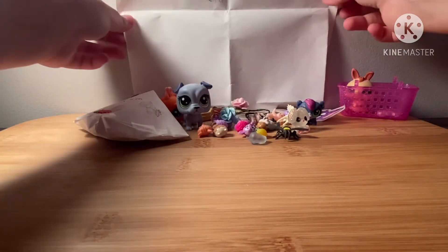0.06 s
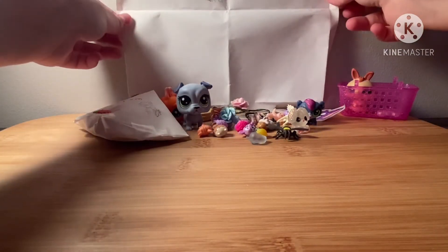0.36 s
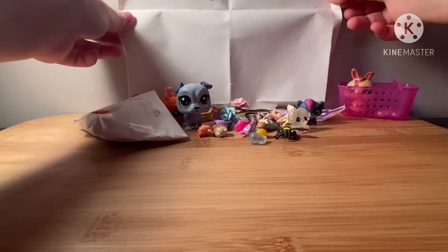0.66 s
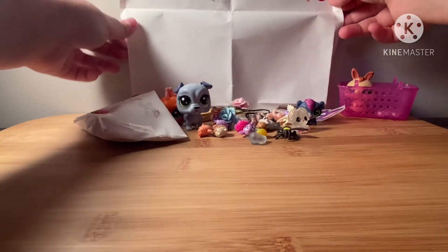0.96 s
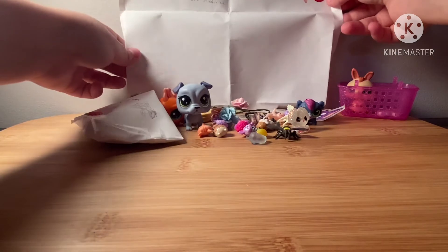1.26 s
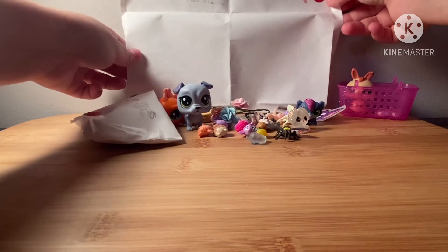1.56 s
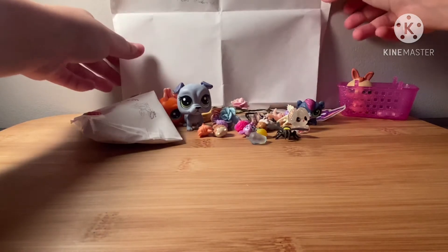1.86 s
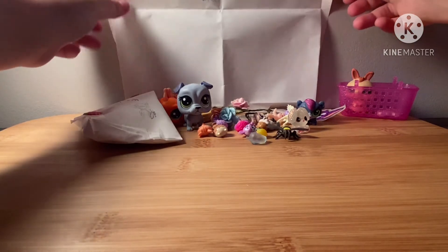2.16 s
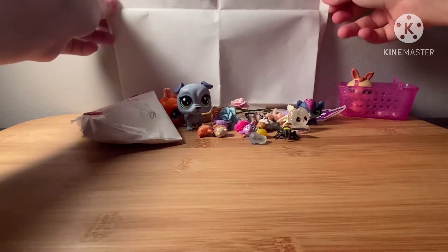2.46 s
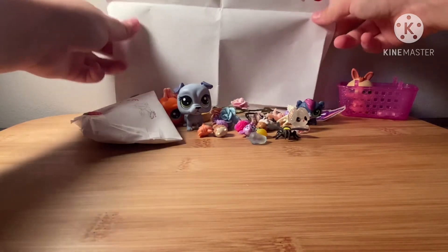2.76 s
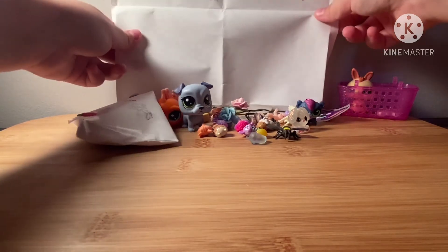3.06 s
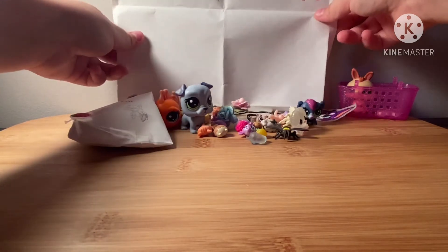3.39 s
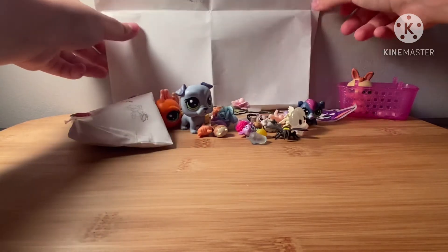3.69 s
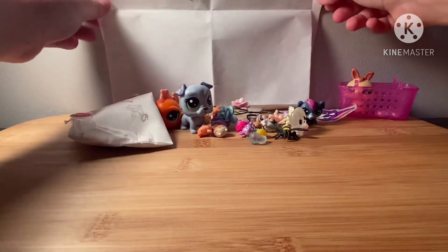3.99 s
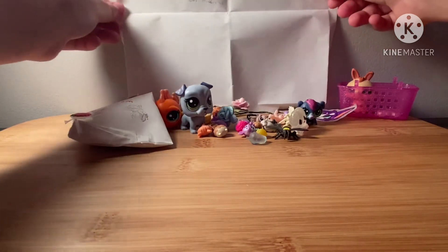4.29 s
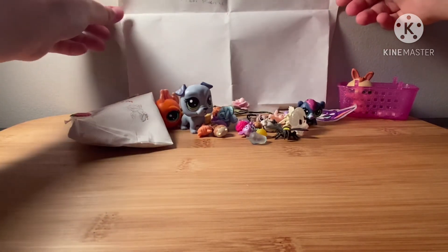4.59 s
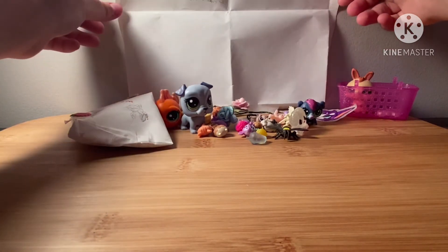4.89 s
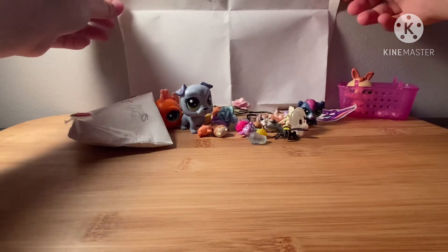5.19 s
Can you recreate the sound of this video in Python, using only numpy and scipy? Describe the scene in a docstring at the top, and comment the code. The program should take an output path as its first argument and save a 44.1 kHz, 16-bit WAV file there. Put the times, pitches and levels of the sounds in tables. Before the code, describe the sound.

Hands press a sheet of paper against a wall, heard from close by in a quiet room with a faint low rumble and hiss. From the start, fingers brush and slide over the paper in uneven, dry strokes while the sheet flexes and bumps softly on the wall. A crisp snap comes at about 1 second, followed by quick rubs with tiny skin ticks, and a few small snaps and knocks around 1.7 seconds. The rubbing grows fuller from 2.4 to 3 seconds, with a couple of sharper swishes. Between 3.4 and 3.6 seconds the paper buckles in a quick cluster of snaps and taps, the loudest moment. Near 4.2 seconds a corner drags with a short, stuttering scrape. After a lull with faint ticks, a few last strokes and light bumps come from 5.2 to 5.4 seconds.

```python
"""Two hands press a sheet of paper against the wall behind some toys on a wooden table in a quiet room.
From the start, fingers brush and slide with a hiss of friction; the sheet flexes, snaps and bumps the wall.
Near 3.5 s come the loudest snaps, as the paper buckles or is tapped, and its damped modes ring.
Near 4.2 s a corner drags in stick-slip motion; a few last strokes and bumps follow by 5.4 s.
All is heard from close by through two microphone ports, over a low rumble and a faint hiss."""
import sys
import numpy as np
from scipy import signal
from scipy.fft import rfft, irfft, next_fast_len
from scipy.io import wavfile
from scipy.ndimage import uniform_filter1d

SR = 44100
rng = np.random.default_rng(int(sys.argv[2]) if len(sys.argv) > 2 else 0)


def materialize(psi):
    """Save the field psi as 16-bit PCM at rate SR to the path in sys.argv[1].

    A 1-D psi becomes a single channel; in a 2-D psi each row is a channel.
    """
    bounded = np.clip(np.atleast_2d(psi).T, -1, 1)
    quanta = np.round(bounded * 32767).astype(np.int16)
    wavfile.write(sys.argv[1], SR, quanta)


N = 240073
TIME = np.arange(N) / SR

# background spectra of the room: (frequency [Hz], relative density [dB])
RUMBLE_SPECTRUM = [(10, -34), (28, -13.5), (42, -4.5), (65, 0), (90, -5.5), (125, -15.5), (180, -24.5),
                   (260, -30), (600, -60.5), (2000, -100)]
HISS_SPECTRUM = [(100, -16), (450, -10), (800, -5), (1300, -5.5), (2000, -12), (4000, -12), (9000, -14.5),
                 (16000, -29.5), (18000, -64)]
# reverberation of the room: (frequency [Hz], T60 [s])
ROOM_DECAY = [(150, 0.69), (500, 0.33), (2000, 0.32), (6000, 0.18), (16000, 0.24)]
# likeness of the echoes at the two ports: (frequency [Hz], coherence [0-1])
PORT_COHERENCE = [(200, 0.68), (1000, 0.22), (5000, 0.44), (7500, 0.7), (9000, 0.95), (16000, 0.89)]
# sensitivity of the right port against the left: (frequency [Hz], gain [dB])
RIGHT_PORT_GAIN = [(200, -0.5), (1000, -2.5), (2300, 1.5), (4500, -2), (8000, 0), (14000, 2)]
# phase of the right port behind the left: (frequency [Hz], lag [rad])
RIGHT_PORT_LAG = [(0, 0.3), (1460, 0.93), (3700, 1), (4570, 2.1), (5680, -1.2), (7240, 0.7), (8270, -2.8),
                  (9040, -9.0), (10400, -12.5), (11600, -12.5), (12600, -15.6), (13800, -15.7),
                  (14700, -18.7), (16400, -18.9)]

# spectra of flexing, rubbed and dragged paper: (frequency [Hz], relative density [dB])
BENDING_SPECTRUM = [(70, -27.5), (120, -0.5), (210, -1.5), (300, -12.5), (470, 1), (680, -13), (950, -15),
                    (2000, -58.5)]
PAPER_SPECTRUM = [(200, -26.5), (450, -6.5), (850, -8.5), (1150, -4), (1600, -4.5), (2500, 0), (4200, -3),
                  (5200, -1.5), (7200, -6), (9500, -10.5), (12500, -12.5), (15300, -12.5), (16000, -27),
                  (17000, -57)]
SCRAPE_SPECTRUM = [(250, -19), (450, -3), (800, -1.5), (1100, -2.5), (1600, 3), (2200, -6), (3400, -2.5),
                   (4200, -7.5), (5100, -1.5), (7500, -9.5), (9600, -6.5), (12500, -14.5), (15600, -6.5),
                   (17000, -54.5)]
# band of a squeak: (frequency / centre frequency [ratio], relative density [dB])
SQUEAK_SPECTRUM = [(0.1, -22), (0.4, -12), (0.8, -10), (1, 0), (1.2, -12), (2.4, -22), (4, -38)]
# resonances of the sheet, the scraping corner and one slip: (frequency [Hz], width [Hz], boost [dB])
SHEET_PEAKS = [(1120, 110, 2), (1550, 260, 4), (1980, 110, 5), (2440, 120, 3), (3800, 400, 2),
               (5400, 400, 2), (7240, 120, 4)]
SCRAPE_PEAKS = [(6110, 230, 9.3)]
SLIP_PEAKS = [(5140, 350, 3.5), (6100, 550, 18.5)]
# modes of the sheet striking the wall: (frequency [Hz], relative level [dB], T60 [s])
THUD_MODES = [(128, -7, .11), (180, -3, .11), (222, 0, .11), (258, -14, .06)]
KNOCK_MODES = [(365, -14.5, 0.088), (448, 2, 0.096), (486, 0.5, 0.087), (576, -12, 0.033), (643, 0, 0.066),
               (774, -6, 0.032)]
CLACK_MODES = [(1117, 6.5, 0.034), (1370, 6.5, 0.028), (1758, -3, 0.03), (1880, -0.5, 0.015),
               (2485, -3.5, 0.025)]

# Event levels are relative. Body is a shelf below 2 kHz, fizz a shelf above 7 kHz.
# the sheet meets the wall: (time [s], thud level [dB], knock level [dB])
WALL_BUMPS = [(0.0, -47, -48), (0.112, -62, -50), (0.401, -49, -52), (0.777, -55.5, -59.5),
              (0.968, -53, -43.5), (1.227, -48.5, -46.5), (1.251, -44, -50), (1.294, -57, -51),
              (1.692, -71, -48.5), (1.719, -41.5, -38), (1.784, -64, -44.5), (2.165, -52, -45),
              (2.267, -49, -45), (2.602, -53, -46), (2.752, -50, -50.5), (3.137, -48.5, -48),
              (3.178, -37.5, -42.5), (3.402, -50, -42), (3.484, -77.5, -49.5), (3.606, -44.5, -38.5),
              (3.643, -54.5, -43.5), (5.228, -46.5, -43.5), (5.415, -65, -52)]
# skin squeaks or ticks on the paper: (time [s], duration [s], level [dB], centre frequency [Hz])
SKIN_SQUEAKS = [(.198, .047, -45, 6400), (.5085, .002, -29.5, 2650), (1.212, .004, -32.5, 5200),
                (1.218, .005, -33, 5500), (4.49, .12, -64.5, 1650)]
# slow slides: (time [s], duration [s], level [dB], growth over the slide [dB], bending level [dB])
FINGER_SLIDES = [(0.02, 0.27, -64, 14.5, -63), (0.454, 0.14, -59.5, -6.5, -63),
                 (0.66, 0.079, -70, -5, -70.5), (0.807, 0.15, -59, 22.5, -59.5),
                 (0.952, 0.25, -54, -10.5, -59), (1.196, 0.12, -51.5, -5.5, -51.5),
                 (1.534, 0.12, -62.5, 19, -73), (1.658, 0.28, -50, -10.5, -54),
                 (1.961, 0.052, -63.5, -1, -64.5), (2.068, 0.27, -55.5, -7.5, -55),
                 (2.39, 0.34, -48.5, 7.5, -63), (2.675, 0.26, -47, 5, -59.5),
                 (3.035, 0.17, -53.5, 7, -45.5), (3.313, 0.12, -49.5, 1.5, -71.5),
                 (3.468, 0.12, -42.5, -3.5, -56.5), (3.625, 0.078, -53.5, 2.5, -56.5),
                 (3.999, 0.094, -52.5, 15, -68), (4.069, 0.24, -45.5, 1, -50.5),
                 (4.337, 0.28, -62.5, -9.5, -62.5), (4.961, 0.078, -55.5, 0, -59),
                 (5.097, 0.12, -54.5, 22.5, -62), (5.254, 0.3, -65, -5, -59)]
# quick strokes: (peak time [s], rise [s], fall [s], level [dB], body [dB], fizz [dB])
FINGER_STROKES = [(0.06, 0.057, 0.039, -44, 4.5, 0), (0.118, 0.016, 0.0064, -46, 1, -6),
                  (0.208, 0.013, 0.0086, -49, -4, 3), (0.304, 0.028, 0.012, -43.5, 3, -4.5),
                  (0.403, 0.032, 0.039, -49, 2, -6.5), (0.749, 0.019, 0.042, -54, 5, -0.5),
                  (0.968, 0.015, 0.014, -31, 2, -8), (0.999, 0.024, 0.0097, -38, 5.5, 0.5),
                  (1.235, 0.015, 0.039, -38.5, -3, -14), (1.27, 0.017, 0.011, -36, -1.5, -15),
                  (1.296, 0.009, 0.019, -40, 12.5, 0.5), (1.595, 0.009, 0.014, -50.5, 10, -7),
                  (2.087, 0.0077, 0.014, -49.5, 4.5, 3), (2.175, 0.054, 0.0085, -42, 4, 7),
                  (2.244, 0.01, 0.007, -43, -1, 4.5), (2.371, 0.019, 0.028, -40, 5.5, 5.5),
                  (2.743, 0.014, 0.013, -28, -9, -4.5), (2.878, 0.035, 0.029, -39.5, -7.5, -5.5),
                  (2.98, 0.046, 0.026, -28, -2, 3), (3.427, 0.011, 0.011, -32, -1, 3.5),
                  (3.856, 0.019, 0.0275, -61.5, 4.5, 6), (4.449, 0.013, 0.017, -46.5, -1, 3),
                  (5.213, 0.016, 0.0116, -38.5, 5, 5), (5.298, 0.016, 0.058, -46, -0.5, 5),
                  (5.357, 0.033, 0.019, -46.5, 7.5, 5.5), (5.415, 0.0085, 0.011, -42, 2.5, 1.5)]
# buckles and nail taps: (time [s], level [dB], body [dB], fizz [dB], left minus right [dB])
PAPER_SNAPS = [(0.073, -45, -1, 11, -2), (0.492, -49.5, 17, 17, 2), (0.876, -49.5, 5, 7, -5),
               (0.967, -31.5, 1.5, -0.5, -1.5), (1.213, -50.5, 12, -8, -5.5), (1.507, -59, -8, 1, 6),
               (1.693, -35, 10, -25, 5.5), (1.72, -36.5, 15, 5, -0.5), (1.781, -35.5, 8, -3, 1.5),
               (1.828, -37, -5, -4, 1.5), (2.268, -47, 17, 9, -2.5), (2.599, -37.5, 10.5, 3.5, 3.5),
               (3.166, -41.5, 15.5, -15, 2), (3.33, -56.5, 4.5, 12, 1.5), (3.4005, -31, 14, -12.5, 3.5),
               (3.4861, -23, 12.5, -6, -2.5), (3.491, -24.5, 7, -6, 2), (3.516, -27.5, 4.5, -1.5, 1.5),
               (3.5661, -29, 8, -1.5, 4), (3.6045, -26.5, 18, -0.5, 3.5), (3.997, -55.5, 2, 1.5, 2.5),
               (4.314, -40.5, 11.5, -12, 2), (4.413, -45, 0, 8.5, 3.5), (4.708, -64, -9, -2, 2.5),
               (4.763, -59.5, 8, -1, 3.5), (4.905, -69, 16.5, -7.5, 4.5)]


def amp(db):
    """Amplitude ratio of a level in decibels."""
    return 10 ** (np.asarray(db) / 20)


def unit(x, first=None):
    """Normalisation to rms 1, taken over all of x or over its first samples."""
    return x / np.sqrt(np.mean(x[:first] ** 2) + 1e-20)


def at_hz(points, hz):
    """Interpolation on a logarithmic frequency axis."""
    f, value = np.transpose(points)
    return np.interp(np.log(hz + 1), np.log(f + 1), value)


def colour(x, spectrum, peaks=(), body_db=0, fizz_db=0):
    """Source-filter model: x takes on a spectrum, resonance peaks and two shelves, at rms 1."""
    size = next_fast_len(x.shape[-1])
    hz = np.fft.rfftfreq(size, 1 / SR)
    body = 1 / (1 + (hz / 2000) ** 4)
    fizz = 1 - 1 / (1 + (hz / 7000) ** 6)
    peaks_db = sum(boost * np.exp(-2 * ((hz - f) / width) ** 2) for f, width, boost in peaks)
    db = at_hz(spectrum, hz) + peaks_db + body_db * body + fizz_db * fizz
    return unit(irfft(rfft(x, size) * amp(db), size)[..., :x.shape[-1]])


def add(mix, start_s, sound):
    """Superposition: a sound joins the mix at its start time."""
    part = mix[:, max(0, round(start_s * SR)):][:, :sound.shape[-1]]
    part += sound[..., :part.shape[1]]


def panned(x, pan_db):
    """Constant-power panning, with the left channel pan_db above the right."""
    return unit(amp([[pan_db / 2], [-pan_db / 2]])) * x


def wander(n, hz):
    """Random modulation: a line through hz Gaussian values a second."""
    return np.interp(np.arange(n) * hz / SR, np.arange(8192), rng.standard_normal(8192))


def room_air():
    """Background noise: a swelling rumble, largely coherent at the two ports, and incoherent hiss."""
    rumble = colour(rng.standard_normal(N) + 0.14 * rng.standard_normal((2, N)), RUMBLE_SPECTRUM)
    hiss = colour(rng.standard_normal((2, N)), HISS_SPECTRUM)
    swell = amp(-57.5 + 2.5 * wander(N, hz=9))
    return panned(swell * rumble, pan_db=4) + amp(-83.5) * hiss


def room(x, early_db, tail_db, early_s, lag_s):
    """Multipath propagation: direct sound, early reflections off table and wall, and a diffuse tail."""
    t = np.arange(SR // 2) / SR
    shape = (2, 2, len(t))
    early_taps, tail_taps = rng.choice([-1., 1.], shape) * (rng.random(shape) < 5000 / SR)
    early = early_taps * np.exp(-t / early_s) * (t > 0)
    bands, when, spectra = signal.stft(tail_taps * (t > .006), SR, nperseg=256)
    decay = amp(-60 * when / at_hz(ROOM_DECAY, bands)[:, None])
    tail = signal.istft(spectra * decay, SR, nperseg=256)[1][:, :len(t)]
    echoes = sum(amp(db) * part / np.linalg.norm(part, axis=1, keepdims=True)
                 for db, part in ((early_db, early), (tail_db, tail)))
    size = next_fast_len(N + len(t))
    hz = np.fft.rfftfreq(size, 1 / SR)
    left, independent = rfft(echoes, size)
    coherence = at_hz(PORT_COHERENCE, hz)
    right = coherence * left + np.sqrt(1 - coherence ** 2) * independent
    direct_right = np.exp(-2j * np.pi * hz * lag_s * (1 - coherence))
    paths = np.array([1 + left, direct_right + right])
    paths /= np.sqrt(np.mean(abs(paths) ** 2))
    return irfft(rfft(x, size) * paths, size)[:, :N]


def slide_envelope(levels_db, release_s, growth_share, grip_s=.028):
    """Power summation of all slides: each grips, grows or weakens steadily, and dies away."""
    power = np.zeros(N)
    for (start, length, _, growth_db, _), db in zip(FINGER_SLIDES, levels_db):
        t = TIME - start
        held = amp(db + growth_share * growth_db * (np.clip(t / length, 0, 1) - .5))
        grip = np.clip(t / grip_s, 0, 1)
        release = np.exp(-np.maximum(t - length, 0) / release_s)
        power += (held * grip * release) ** 2
    return np.sqrt(power)


def bending_sheet(settle_s=.034, stroke_coupling_db=-14.5):
    """Forced vibration: the large sheet wobbles softly under every slide and stroke."""
    wobble = colour(rng.standard_normal(N), BENDING_SPECTRUM) * amp(2 * wander(N, hz=45))
    push = slide_envelope(np.array(FINGER_SLIDES)[:, 4], settle_s, growth_share=.87)
    for peak, rise, fall, db, body_db, _ in FINGER_STROKES:
        swell = np.interp(TIME - peak, [-rise, 0, fall + settle_s], [0, 1, 0])
        push = np.hypot(push, amp(db + body_db + stroke_coupling_db) * swell)
    return panned(push * wobble, pan_db=3.5)


def ring(modes, t):
    """Free vibration: damped modes, slightly retuned by where the sheet is held."""
    hz, db, t60 = np.transpose(modes)[:, :, None]
    detune, phase = rng.random((2, len(modes), 1))
    tuned_hz = hz * (1 + .054 * (detune - .5))
    return np.sum(amp(db - 60 * t / t60) * np.sin(2 * np.pi * (tuned_hz * t + phase)), axis=0)


def wall_bumps(thud_glide=.38, glide_s=.0045):
    """Impact and dispersion: a prompt knock and a slower thud, falling as fast bending waves lead."""
    out = np.zeros((2, N))
    t = np.arange(8192) / SR
    gliding_t = t + thud_glide * glide_s * (1 - np.exp(-t / glide_s))
    for start, thud_db, knock_db in WALL_BUMPS:
        thud = ring(THUD_MODES, gliding_t) * (1 - np.exp(-t / .006))
        knock = ring(KNOCK_MODES, t) * (1 - np.exp(-t / .0012))
        for db, sound in ((thud_db, thud), (knock_db, knock)):
            add(out, start, panned(amp(db) * unit(sound, first=SR // 40), pan_db=2))
    return out


def squeaks(attack_s=.00033, release_s=.0025):
    """Frictional chatter: skin on paper sounds in one narrow band."""
    out = np.zeros((2, N))
    t = np.arange(8192) / SR
    for start, length, db, centre_hz in SKIN_SQUEAKS:
        band = colour(rng.standard_normal(len(t)), np.array(SQUEAK_SPECTRUM) * [centre_hz, 1])
        envelope = (1 - np.exp(-t / attack_s)) * np.exp(-np.maximum(t - length, 0) / release_s)
        add(out, start, panned(amp(db) * band * envelope, pan_db=-1))
    return out


def friction(n, catches_per_s, clump_db, clump_hz):
    """Roughness noise: fibres catch and let go, giving clumps of tiny clicks over a smooth hiss."""
    clicks = rng.standard_normal(n) * (rng.random(n) < catches_per_s / SR)
    return (unit(clicks) + rng.standard_normal(n)) * amp(clump_db * wander(n, clump_hz))


def sliding_fingers(crinkles_per_s=45, drift_db=2.2):
    """Sliding friction: small creases give way, and the timbre drifts as skin or nail meets the sheet."""
    grains = friction(N, catches_per_s=1500, clump_db=2, clump_hz=174)
    crinkles = unit(rng.laplace(size=N) * (rng.random(N) < crinkles_per_s / SR))
    rub = colour(unit(grains) + amp(-12) * crinkles, PAPER_SPECTRUM, SHEET_PEAKS, body_db=2.5, fizz_db=1)
    spectra = signal.stft(rub, nperseg=256)[2]
    # random gains, smoothed over frequency and then over time
    patches = uniform_filter1d(rng.standard_normal(spectra.shape), size=5, axis=0)
    patches = unit(uniform_filter1d(patches, size=24, axis=1))
    drifting = signal.istft(spectra * amp(drift_db * patches), nperseg=256)[1][:N]
    pressure = slide_envelope(np.array(FINGER_SLIDES)[:, 2], release_s=.025, growth_share=1)
    pressure *= amp(1.7 * wander(N, hz=40))
    return panned(pressure * unit(drifting), pan_db=1)


def tensioned_peaks():
    """Tension sets pitch: each touch tightens the sheet differently and moves its resonances."""
    peaks = np.array(SHEET_PEAKS, float)
    peaks[:, 0] *= 1 + rng.uniform(-.1, .1, len(peaks))
    return peaks


def finger_strokes():
    """Friction noise follows speed: each quick stroke swells and dies with the finger's motion."""
    out = np.zeros((2, N))
    t = np.arange(6000) / SR
    for peak, rise, fall, db, body_db, fizz_db in FINGER_STROKES:
        grains = friction(len(t), catches_per_s=3400, clump_db=.24, clump_hz=373)
        rub = colour(grains, PAPER_SPECTRUM, tensioned_peaks(), body_db, fizz_db)
        speed = np.sin(np.pi / 2 * np.interp(t, [0, rise, rise + fall], [0, 1, 0])) ** 1.01
        add(out, peak - rise, panned(amp(db) * speed * rub, pan_db=.1))
    return out


def crack(noise, front_s, ring_s, ring_db):
    """A transient with two decays: a sharp front and a short flutter, at rms 1 over the first 7 ms."""
    t = np.arange(len(noise)) / SR
    attack = 1 - np.exp(-t / .00015)
    decay = np.exp(-t / front_s) + amp(ring_db) * np.exp(-t / ring_s)
    return unit(noise * attack * decay, first=int(.007 * SR))


def drag_gain(from_peak_s, hold_s=.032):
    """Amplitude follows speed: the corner accelerates, runs fast for a moment and stops quickly."""
    outside_hold_s = np.maximum(abs(from_peak_s) - hold_s / 2, 0)
    db_per_s = np.where(from_peak_s < 0, 142, 334)
    return amp(-30 - outside_hold_s * db_per_s)


def dragging_corner(peak_s=4.232, slips_per_s=85):
    """Stick-slip motion: the corner scrapes along and jumps in uneven slips that ring near 6 kHz."""
    grains = friction(N, catches_per_s=2300, clump_db=-3, clump_hz=284)
    # the free flap of paper shortens, so its two hollow notes rise
    flap_hz = np.interp(TIME, [4.15, 4.29], [640, 870])
    phase = 2 * np.pi * np.cumsum(flap_hz) / SR
    flap = sum(wander(N, hz=150) * np.cos(ratio * phase) for ratio in (1, 1.4))
    scrape = colour(grains, SCRAPE_SPECTRUM, SCRAPE_PEAKS, body_db=-4) + amp(-9) * flap
    contact = np.interp(TIME, [4.0, 4.08], [0, 1])
    out = panned(contact * drag_gain(TIME - peak_s) * scrape, pan_db=1.5)
    slip_offsets = (np.arange(-10, 5) + .22 * rng.standard_normal(15)) / slips_per_s
    for offset in slip_offsets:
        noise = colour(rng.standard_normal(2048), SCRAPE_SPECTRUM, SLIP_PEAKS)
        slip = amp(1.5) * crack(noise, front_s=.002, ring_s=.004, ring_db=-20)
        add(out, peak_s + offset, panned(drag_gain(offset) * slip, pan_db=15))
    return out


def snaps():
    """Impulsive excitation: the sheet buckles or a nail taps it; fuller snaps clack more on the wall."""
    out = np.zeros((2, N))
    t = np.arange(4096) / SR
    for start, db, body_db, fizz_db, pan_db in PAPER_SNAPS:
        flutter = colour(rng.standard_normal(len(t)), PAPER_SPECTRUM, tensioned_peaks(), body_db, fizz_db)
        snap = crack(flutter, front_s=.0018, ring_s=.006, ring_db=-13)
        clack = ring(CLACK_MODES, t) * amp(min(body_db - 16, -5))
        add(out, start, panned(amp(db) * (snap + clack), pan_db))
    return out


def scene():
    """Superposition: each spot on the sheet reaches the ports by its own paths, over the room's noise."""
    rubbing = sliding_fingers() + finger_strokes() + squeaks()
    handover = np.pi / 4 * (1 + np.tanh(2 * wander(N, hz=6)))  # the rubbing passes between the hands
    left_hand = room(rubbing * np.cos(handover), early_db=-3, tail_db=-14, early_s=.005, lag_s=.00012)
    right_hand = room(rubbing * np.sin(handover), early_db=-3, tail_db=-14, early_s=.005, lag_s=-.00008)
    dragging = room(dragging_corner(), early_db=0, tail_db=-12, early_s=.003, lag_s=.0001)
    snapping = room(snaps(), early_db=-2, tail_db=-12, early_s=.003, lag_s=.00015)
    bending = room(bending_sheet() + wall_bumps(), early_db=-10, tail_db=-16, early_s=.0026, lag_s=.0001)
    return room_air() + amp(-2.2) * bending + left_hand + right_hand + dragging + amp(-1.5) * snapping


def record(dry):
    """Frequency response: the two ports differ in gain and phase, and a low-pass limits the band."""
    size = next_fast_len(N)
    hz = np.fft.rfftfreq(size, 1 / SR)
    response = amp(at_hz(RIGHT_PORT_GAIN, hz)) * np.exp(-1j * at_hz(RIGHT_PORT_LAG, hz))
    right = irfft(rfft(dry[1], size) * response, size)[:N]
    low_pass = signal.firwin(511, cutoff=16050, window=("kaiser", 9), fs=SR)
    return signal.oaconvolve(np.array([dry[0], right]), low_pass[None], "same")


dry = scene()
out = record(dry)
materialize(out)
```